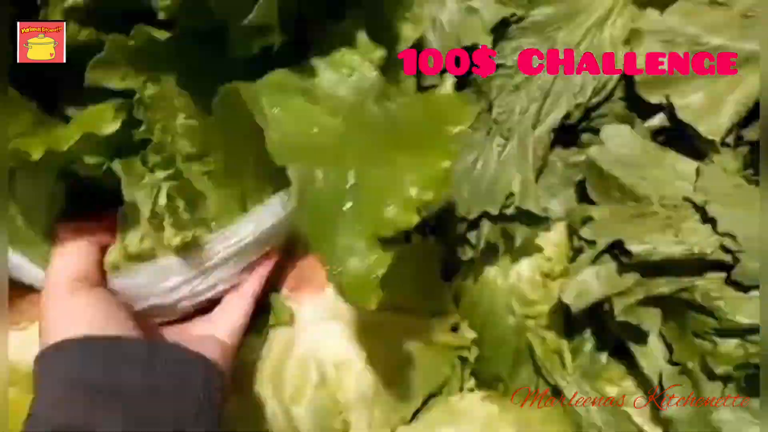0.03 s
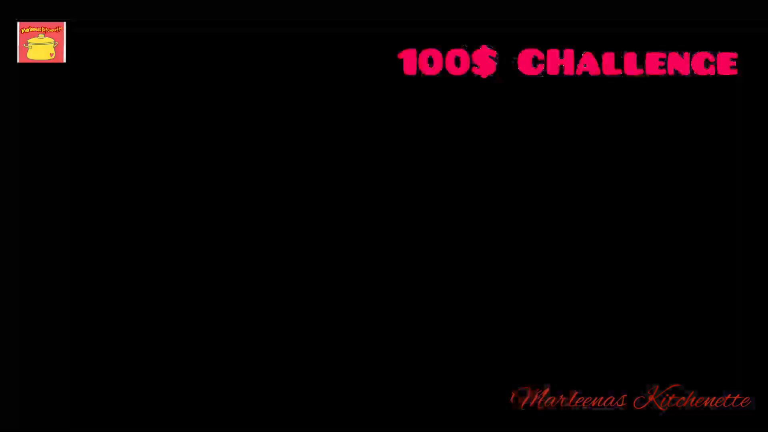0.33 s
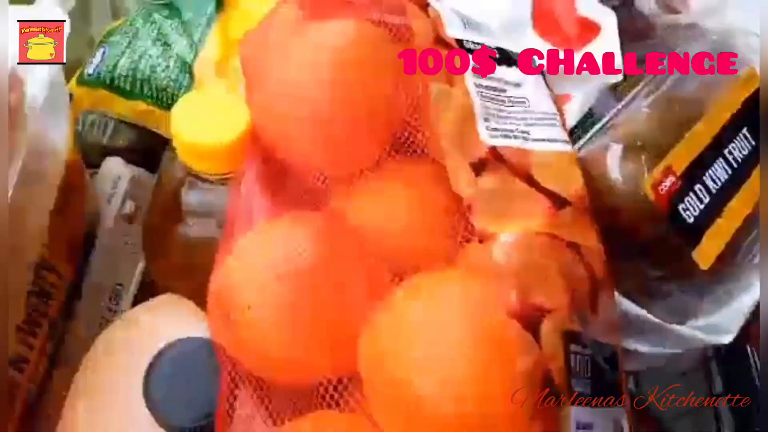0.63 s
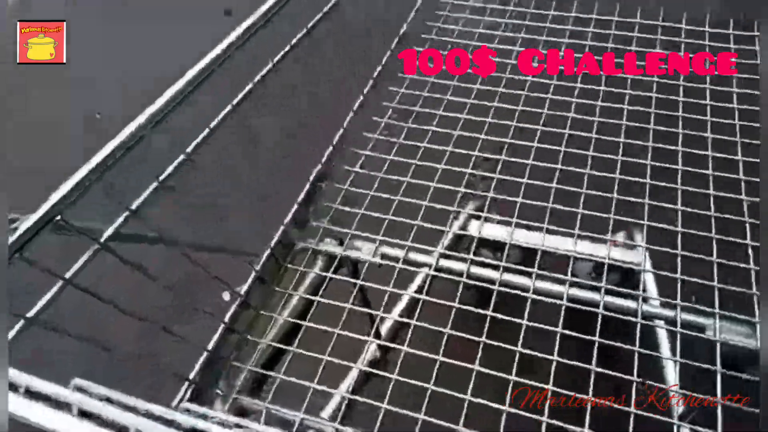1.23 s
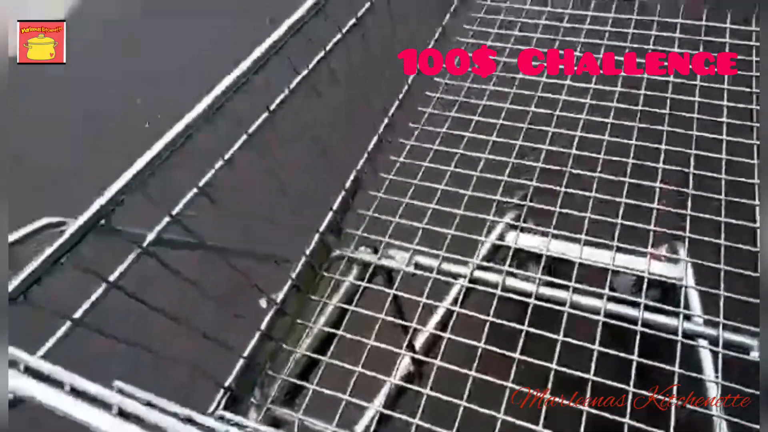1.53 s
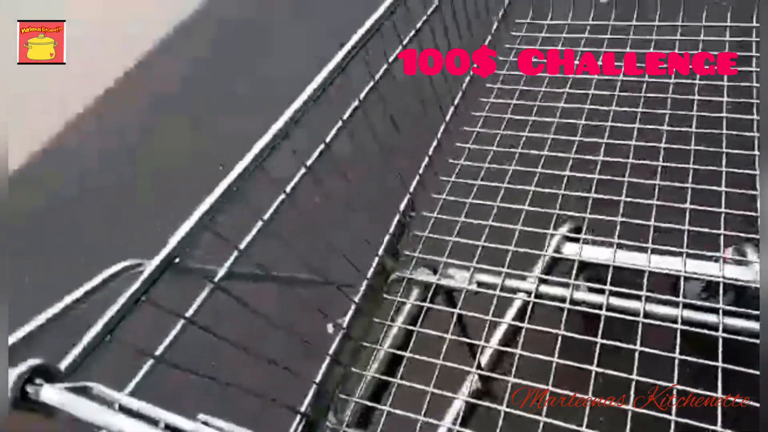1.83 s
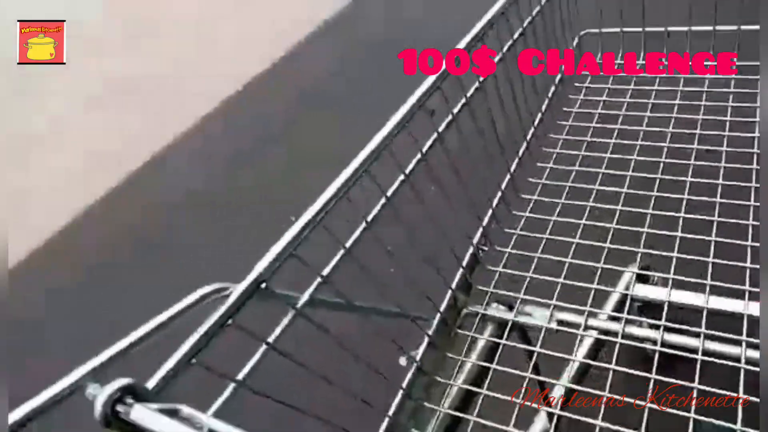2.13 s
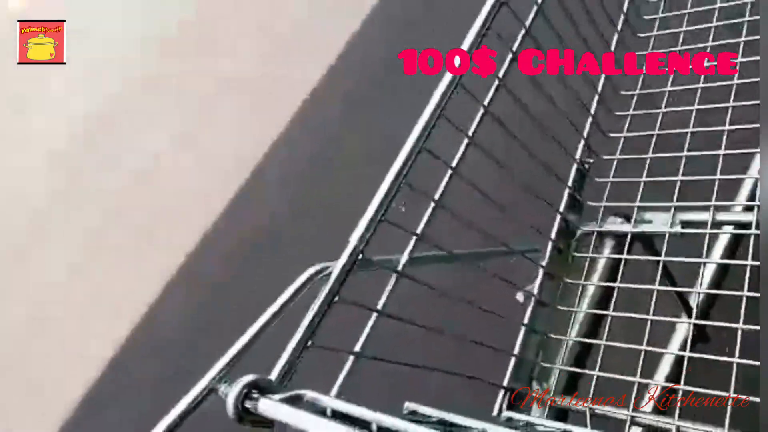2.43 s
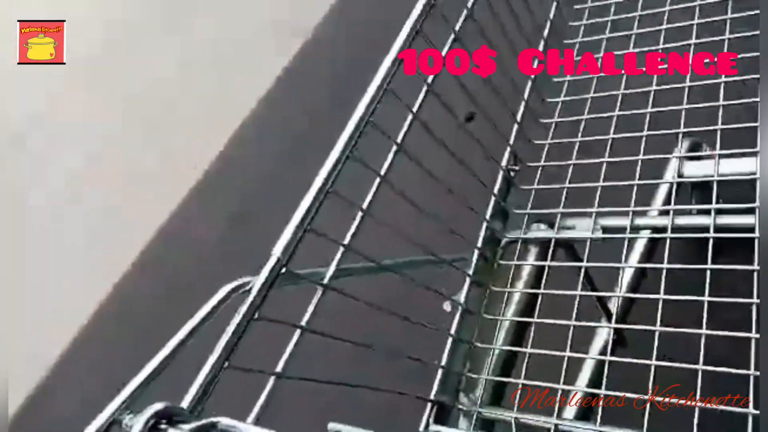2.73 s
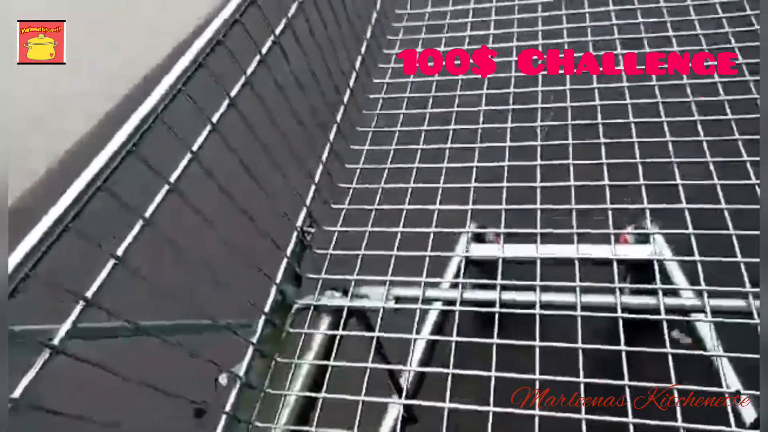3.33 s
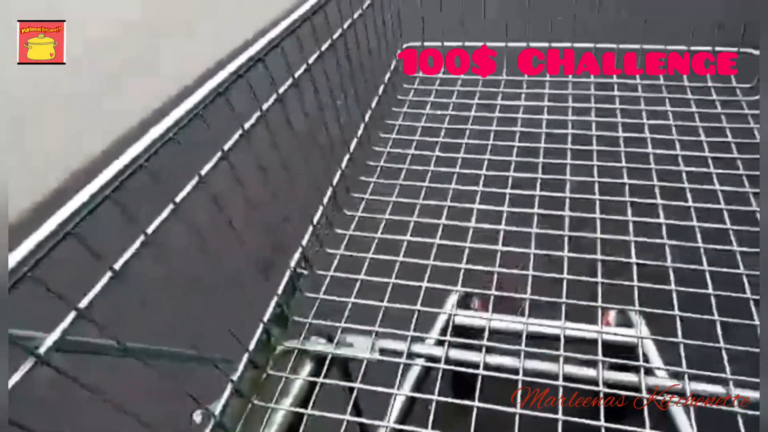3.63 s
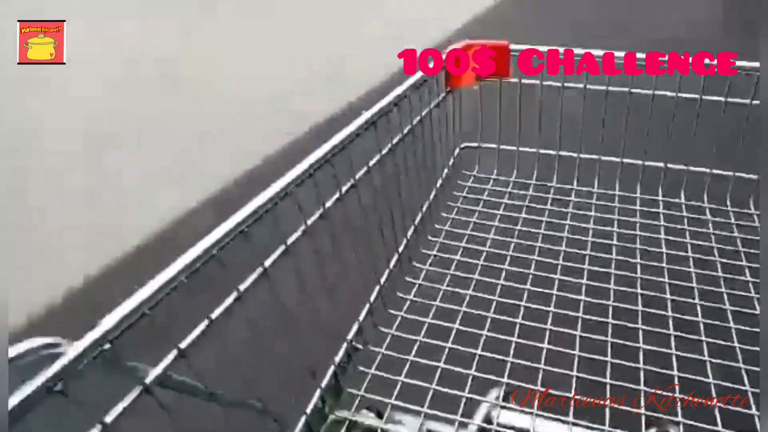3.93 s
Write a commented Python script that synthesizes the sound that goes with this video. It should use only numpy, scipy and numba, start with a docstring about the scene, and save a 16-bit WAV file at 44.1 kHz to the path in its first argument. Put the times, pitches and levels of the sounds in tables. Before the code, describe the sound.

Metal shopping cart rolling and clattering on rough pavement, with wind rumbling and popping.

```python
"""Wire shopping cart outdoors.

It rolls briefly with groceries, the sound cuts to silence, then it rolls empty over asphalt.
Grit under the wheels keeps the frame buzzing; bumps make the loose basket wires clash and chatter.
Wind rumbles and pops on the microphone, whose gain control ducks after the strongest pops."""
import sys
import numpy as np
from scipy import signal
from scipy.fft import rfft, irfft
from scipy.io import wavfile
from scipy.ndimage import uniform_filter1d
from numba import njit

SR = 44100
rng = np.random.default_rng(int(sys.argv[2]) if len(sys.argv) > 2 else 0)


def inscribe(sig):
    """Save sig as 16-bit PCM at rate SR to the path in sys.argv[1].

    A 1-D sig is mono; a 2-D sig holds one channel per row.
    Samples are clipped to [-1, 1] before scaling.
    """
    pcm = np.round(np.clip(np.atleast_2d(sig).T, -1, 1) * 32767)
    wavfile.write(sys.argv[1], SR, pcm.astype(np.int16))


N = 176400
TOP_HZ = 13800
CUT_S, RESUME_S = 0.598, 0.99


def undb(db):
    """Decibels to gain."""
    return 10 ** (np.asarray(db) / 20)


def unit(x):
    """Scale to rms 1."""
    return x / np.sqrt(np.mean(x ** 2))


def seconds(length_s):
    """Time axis."""
    return np.arange(int(length_s * SR)) / SR


def curve(rows):
    """Gain over time from rows of t/s, level/dB."""
    return undb(np.interp(np.arange(N) / SR, *np.array(rows).T))


def colour(x, points, size=4096):
    """Minimum-phase filter through rows of f/Hz, level/dB."""
    hz, db = np.array(points, float).T
    bins_hz = np.arange(size // 2 + 1) * SR / size
    gain = undb(np.interp(np.log(bins_hz + 1), np.log(hz), db))
    cepstrum = irfft(np.log(gain))
    cepstrum[1:size // 2] *= 2
    cepstrum[size // 2 + 1:] = 0
    return signal.fftconvolve(x, irfft(np.exp(rfft(cepstrum))))[:len(x)]


def butter(x, order, hz, kind):
    """Butterworth filter."""
    return signal.sosfilt(signal.butter(order, hz, kind, fs=SR, output="sos"), x)


def noise(t, order, hz, kind="band"):
    """Filtered noise along t, rms 1."""
    return unit(butter(rng.standard_normal(len(t)), order, hz, kind))


def wander(rate_hz):
    """Smooth random drift, rms 1."""
    step = int(SR / rate_hz)
    stairs = np.repeat(rng.standard_normal(N // step + 1), step)
    return unit(uniform_filter1d(stairs, step)[:N])


def add(out, at_s, x):
    """Mix x in at a time."""
    i = int(at_s * SR)
    out[i:i + len(x)] += x[:max(N - i, 0)]


# Bumps that shake the basket: t/s, level/dB, treble tilt/(dB/octave)
BUMPS = [(1.953, -5, -4.5), (1.975, -5, -4), (2.027, -5.5, -5.5), (2.205, -4.5, -10), (2.241, -2.5, 0),
         (2.288, -3.5, -11.5), (2.35, -4.5, -5.5), (2.384, -13, 12.5), (2.403, -8.5, -23),
         (2.429, -10.5, 10), (2.471, -4.5, 6), (2.505, -2.5, -2.5), (2.545, -15, 5), (2.637, -9, 4.5),
         (2.648, -6, -13.5), (2.772, -10, -8), (2.805, -8, -6.5), (2.924, -9, 0.5), (2.95, -7, -5),
         (3.044, -10.5, -6), (3.08, -7.5, -11), (3.152, -7, -5), (3.215, -5, -5.5), (3.28, -10, 1),
         (3.39, -5, -2.5), (3.411, -7, -7), (3.517, -7, -0.5), (3.565, -4, 3), (3.61, -5.5, 3.5),
         (3.629, -2, 2), (3.664, -0.5, 2), (3.762, -3, 3), (3.8, -3.5, 2), (3.842, -1.5, 2.5),
         (3.887, -5.5, 3.5), (3.951, -5.5, -0.5)]


def basket(panel_count=3, rms_db=-29.5, chatter_per_s=650, chatter_s=0.022, pivot_hz=3150):
    """Each bump is a blow and a dying wire chatter, on the panels in turn; harder contact is brighter."""
    panels = [panel() for _ in range(panel_count)]
    blows = np.zeros((panel_count, N))
    size = 8192
    t, hz = np.arange(size) / SR, np.arange(size // 2 + 1) * SR / size
    octaves = np.log2(np.hypot(1, hz / pivot_hz)) - 0.5
    for k, (at_s, db, tilt_db) in enumerate(BUMPS):
        hits = rng.standard_normal(size) * (rng.random(size) < chatter_per_s / SR)
        hits *= np.exp(-t / chatter_s)
        hits /= np.linalg.norm(hits) + 1e-9
        hits[16] += 0.58  # first blow
        tilted = irfft(rfft(hits) * undb(tilt_db * octaves))
        add(blows[k % panel_count], at_s, undb(db) * tilted)
    rattle = sum(signal.fftconvolve(blow, ring)[:N] for blow, ring in zip(blows, panels))
    return undb(rms_db) * unit(rattle)


def clinks(gain_db=-24.5, decay_s=0.003):
    """A short bright scrape of steel on steel opens each clash, stronger for harder contact."""
    out, t = np.zeros(N), seconds(0.06)
    for at_s, db, tilt_db in BUMPS:
        scrape = noise(t, 2, hz=[630, TOP_HZ]) * np.exp(-t / decay_s)
        add(out, at_s, undb(gain_db + db + tilt_db) * scrape)
    return out


# Spectrum of the ringing mesh: f/Hz, level/dB
MESH_SPECTRUM = [(200, -45), (1150, -10), (1480, -2.5), (2200, -2), (3000, -3.5), (3400, 3), (3750, -0.5),
                 (4450, -6), (5500, -3.5), (6600, -4), (8100, -16), (10500, -13), (14000, -25)]
# Notes of single wires: f/Hz, level/dB
WIRE_MODES = [(1588, -22.5), (2110, -20), (2283, -17.5), (3359, -17), (3432, -19), (4715, -34), (5270, -19),
              (5744, -20), (6724, -27)]


def panel(wire_t60_s=0.18, reference_hz=3150):
    """A struck basket panel rings as a mesh and as single wires; thinner, higher wires ring longer."""
    t = seconds(1)
    mesh = unit(colour(np.pad(mesh_ring(), (0, SR // 2)), MESH_SPECTRUM))
    wires = np.zeros(len(t))
    for hz, db in WIRE_MODES:
        t60_s = wire_t60_s * hz / reference_hz
        note = np.sin(2 * np.pi * (hz * t + rng.random()))
        wires += undb(db) * unit(note * undb(-60 * t / t60_s))
    return mesh + wires


def mesh_ring(t60_s=0.33, crack_s=0.002, flatten_over_hz=130):
    """One blow on the mesh: a crack, then countless evenly spread modes dying together."""
    size = SR // 2
    t, hz = np.arange(size) / SR, np.arange(size // 2 + 1) * SR / size
    crack = 1 + 1.5 * np.exp(-t / crack_s)
    ring = rng.standard_normal(size) * undb(-60 * t / t60_s) * crack
    power = uniform_filter1d(np.abs(rfft(ring)) ** 2, int(flatten_over_hz * size / SR))
    flattening = np.column_stack([hz + 1, -10 * np.log10(power)])
    return unit(colour(ring, flattening))


# Strikes of a loose part: t/s, level/dB
PING_STRIKES = [(3.152, -32), (3.3275, -25.5), (3.413, -26.5), (3.628, -20)]


def pings(note_hz=5350, rise_s=0.002):
    """A loose part strikes a wire and stays on it: a bright scrape and a rough, quickly damped note."""
    out, t = np.zeros(N), seconds(0.06)
    envelope = t / rise_s * np.exp(1 - t / rise_s)
    for at_s, db in PING_STRIKES:
        note = noise(t, 1, [0.93 * note_hz, 1.07 * note_hz])
        scrape = noise(t, 2, note_hz, "high")
        add(out, at_s, undb(db) * envelope * (note + 0.76 * scrape))
    return out


# Rolling noise: t/s, level/dB
ROLL_LEVEL = [(0, -38.5), (.6, -38), (1.0, -45), (1.28, -37), (1.85, -37.5), (1.95, -33), (2.55, -33),
              (2.61, -37), (2.9, -36.5), (3.1, -33), (3.5, -34.5), (4.0, -33.5)]
# Rolling spectrum, loaded cart: f/Hz, level/dB
LOADED_SPECTRUM = [(200, 3), (600, -5), (1800, -3), (4700, -11), (6700, -10), (8000, -29), (10500, -24),
                   (14000, -47.5)]
# Rolling spectrum, empty cart: f/Hz, level/dB
EMPTY_SPECTRUM = [(300, 1), (1100, 2), (1600, 7), (3500, 3), (4600, -5), (6600, -6), (8000, -21),
                  (10500, -15), (14000, -34.5)]


def wheels(grains_per_s=5000, spread_db=16.5):
    """Grains of asphalt tap the wheels and keep the frame buzzing; a load changes its colour."""
    frame_ring = mesh_ring()
    grit = rng.choice([-1, 1], N) * (rng.random(N) < grains_per_s / SR)
    taps = grit * undb(spread_db * rng.random(N))
    buzz = unit(taps) + 0.3 * unit(signal.fftconvolve(taps, frame_ring)[:N])
    loaded, empty = unit(colour(buzz, LOADED_SPECTRUM)), unit(colour(buzz, EMPTY_SPECTRUM))
    return curve(ROLL_LEVEL) * np.where(np.arange(N) / SR < RESUME_S, loaded, empty)


# Wind on the microphone: t/s, level/dB
GUST_LEVEL = [(0, -38.5), (.45, -41.5), (1.0, -44.5), (1.5, -34.5), (1.68, -33), (1.85, -37.5), (2.2, -40),
              (2.68, -31.5), (3.38, -33.5), (3.48, -36.5), (3.8, -36.5), (4.0, -39.5)]
# Spectrum of the wind rumble: f/Hz, level/dB
RUMBLE_SPECTRUM = [(25, -24.5), (45, -17.5), (80, 1), (170, -2.5), (500, -20.5), (4000, -59)]
# Pops at the microphone port, mostly from eddies; the bright snap at 0.2428 s is a plastic bag crinkling, given
# the same shape: t/s, level/dB, nominal f/Hz
PORT_POPS = [(0.0926, -8.5, 1700), (0.1649, -16, 169), (.168, -17.5, 255), (0.2428, -2, 5650),
             (.2426, -3, 685), (0.356, -15, 350), (0.5848, -13, 1296), (1.6118, -12, 307),
             (1.620, -10, 216), (2.3313, -18.5, 447), (2.376, -16, 232), (2.481, -13, 490),
             (2.5999, -7, 1210), (2.6722, -12.5, 124), (2.688, -10, 355), (2.7247, -7.5, 398),
             (2.7765, -10.5, 332), (2.869, -15, 530), (2.913, -12.5, 1190), (2.953, -12, 820),
             (3.0668, -12, 1050), (3.197, -13, 523), (3.2233, -11.5, 860), (3.2503, -14, 696),
             (3.26, -15, 890), (3.278, -14, 690), (3.325, -15.5, 800), (3.347, -19, 900), (3.369, -14, 664),
             (3.4916, -10.5, 1200), (3.5642, -10.5, 1090), (3.5924, -14, 646), (3.6042, -15.5, 287),
             (3.7154, -9.5, 1030), (3.808, -12, 124)]


def wind(flutter_db=2.04, flutter_hz=45.33, eddies_per_s=11, eddy_gain_db=9.5):
    """Wind buffets the microphone: a fluttering rumble, distinct pops and small random eddies; one sharp snap
    of a bag takes the pop's shape."""
    gust = curve(GUST_LEVEL)
    turbulence = rng.standard_normal(N) * undb(flutter_db * wander(flutter_hz))
    out = gust * unit(colour(turbulence, RUMBLE_SPECTRUM))
    for at_s, db, hz in PORT_POPS:
        add(out, at_s, undb(db) * pop(hz))
    eddies = (rng.random(N) < eddies_per_s / SR) * rng.uniform(0.65, 1, N)
    eddies *= gust * undb(eddy_gain_db)
    return out + signal.fftconvolve(eddies, pop(hz=450))[:N]


def pop(hz, decay_cycles=0.55, slowing_cycles=0.66, front_cycles=0.1):
    """A pop: a sharp front, then a slowing swing that dies almost at once."""
    start_hz = 1.71 * hz
    cycles = slowing_cycles * np.log1p(start_hz * seconds(0.06) / slowing_cycles)
    swing = -np.sin(2 * np.pi * (cycles + front_cycles))  # starting mid-swing makes the click
    return swing * np.exp(-(cycles / decay_cycles) ** 2)


# Crinkles of plastic bags: t/s, level/dB
BAG_CRINKLES = [(0.06, -26.5), (0.163, -22), (0.1697, -27), (0.451, -37)]


def bags(decay_s=0.001):
    """Plastic among the groceries gives brief thin crackles."""
    out, t = np.zeros(N), seconds(0.03)
    for at_s, db in BAG_CRINKLES:
        crackle = noise(t, 1, hz=[6000, TOP_HZ]) * np.exp(-t / decay_s)
        add(out, at_s, undb(db) * crackle)
    return out


def scene():
    """Cart, groceries and wind at one microphone near the handle."""
    return (basket() + wheels() + wind() + bags() + clinks() + pings())[None]


@njit
def follow_peaks(x, release_s):
    """Peak follower with an exponential release."""
    decay = np.exp(-1 / (release_s * SR))
    out, peak = np.empty(len(x)), 0.0
    for i in range(len(x)):
        peak = max(x[i], peak * decay)
        out[i] = peak
    return out


def gain_control(x, threshold_db=-15, sense_below_hz=1137, lag_s=0.005):
    """Gain that ducks just after low blasts pass the threshold, then recovers."""
    t = np.arange(N) / SR
    blast = follow_peaks(np.abs(butter(x, 2, sense_below_hz, "low")), release_s=0.084)
    gain = 1 / np.maximum(blast / undb(threshold_db), 1)
    return uniform_filter1d(np.interp(t - lag_s, t, gain), size=44)


def record(dry, low_cut_hz=43, fade_s=0.14):
    """The sound ducks after blasts, is cut, fades back in, and loses its deepest bass and its top."""
    t = np.arange(N) / SR
    ducked = butter(dry, 3, low_cut_hz, "high") * gain_control(dry[0])
    gate = (t < CUT_S) + np.clip((t - RESUME_S) / fade_s, 0, 1) ** 0.61
    top_cut = signal.ellip(10, 0.2, 80, TOP_HZ, fs=SR, output="sos")
    return signal.sosfilt(top_cut, ducked * gate)


dry = scene()
out = record(dry)
inscribe(out)
```